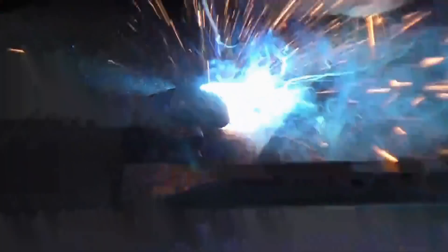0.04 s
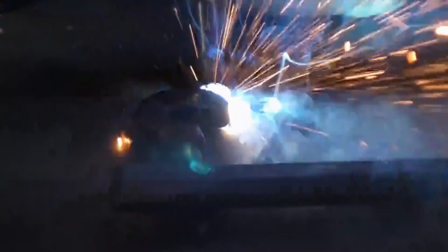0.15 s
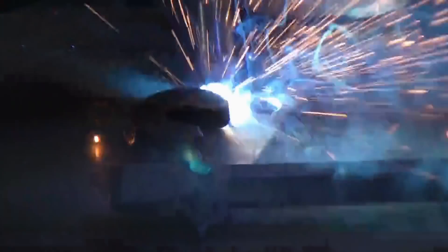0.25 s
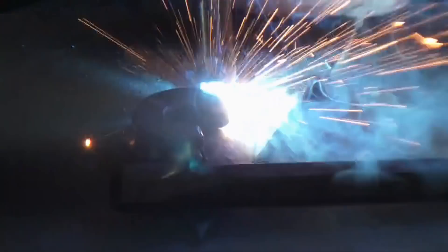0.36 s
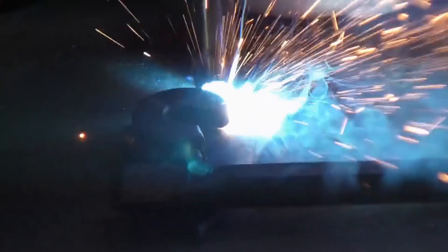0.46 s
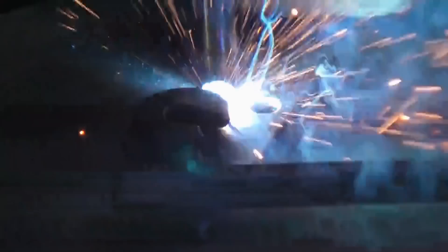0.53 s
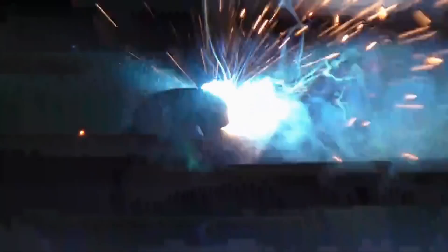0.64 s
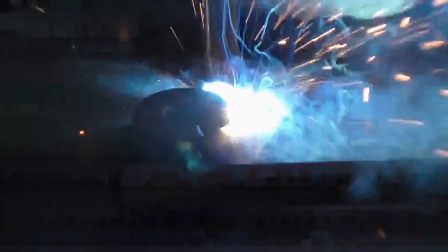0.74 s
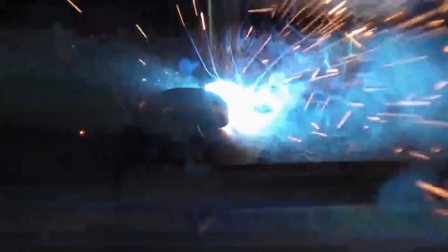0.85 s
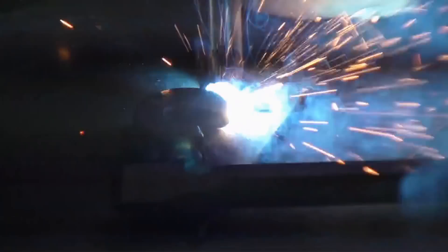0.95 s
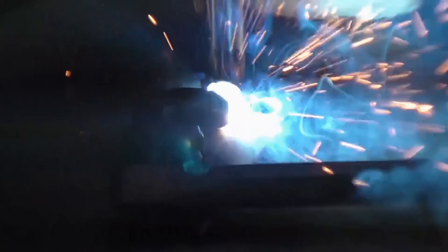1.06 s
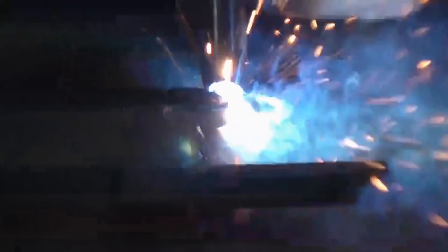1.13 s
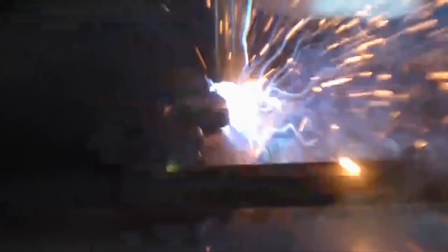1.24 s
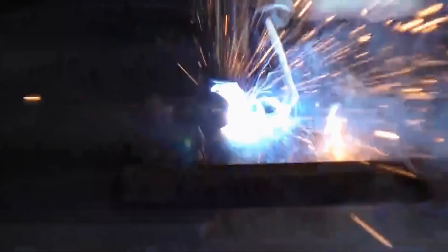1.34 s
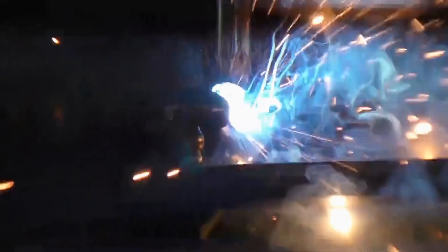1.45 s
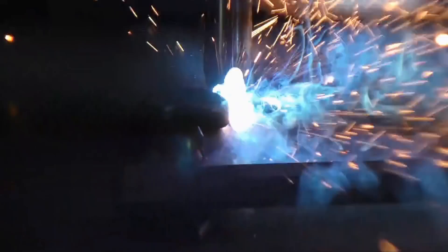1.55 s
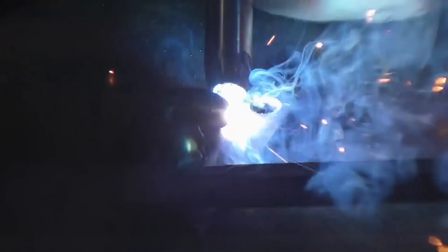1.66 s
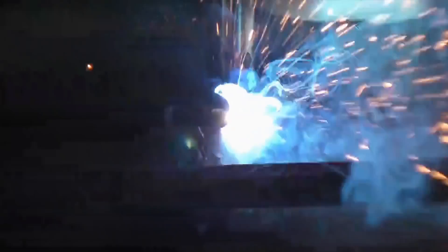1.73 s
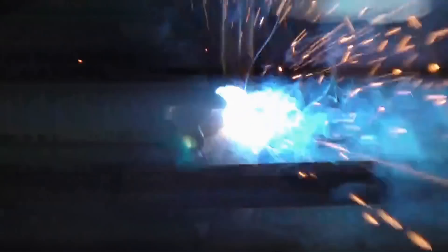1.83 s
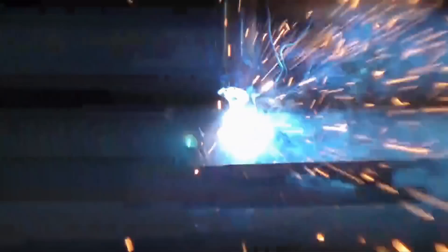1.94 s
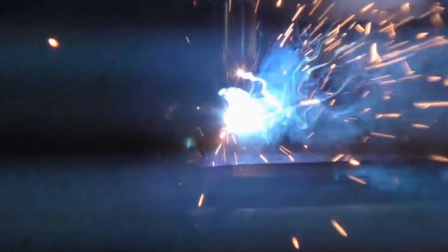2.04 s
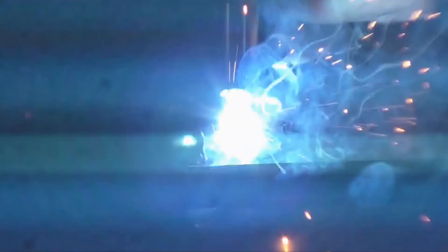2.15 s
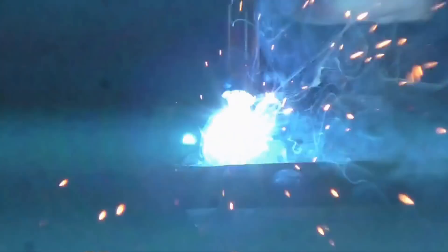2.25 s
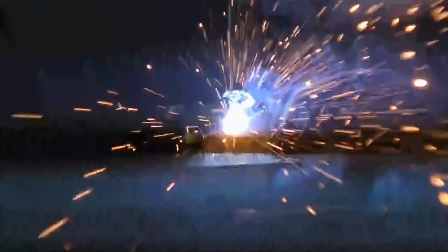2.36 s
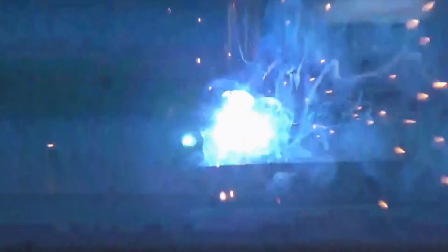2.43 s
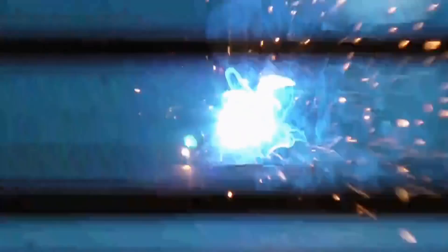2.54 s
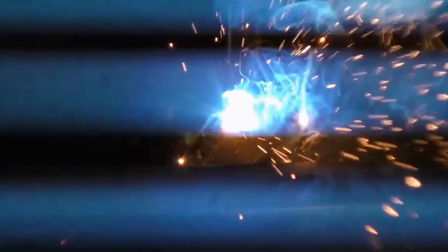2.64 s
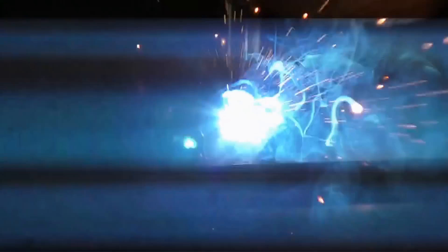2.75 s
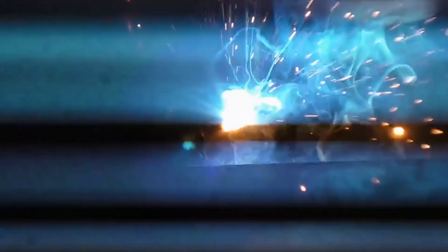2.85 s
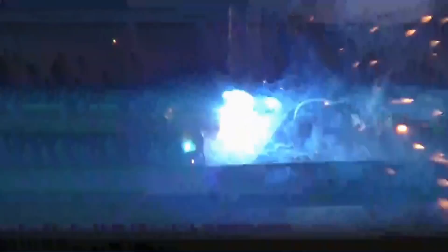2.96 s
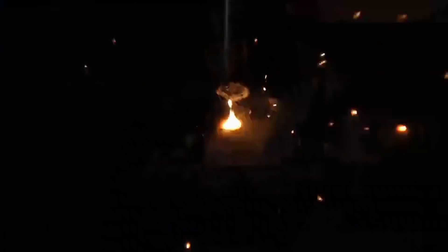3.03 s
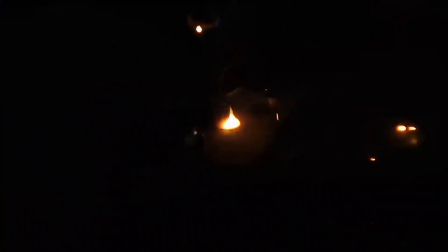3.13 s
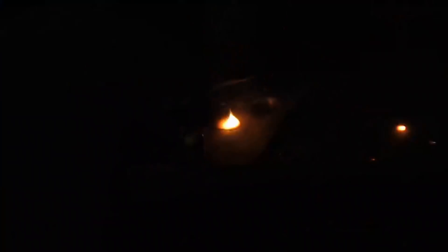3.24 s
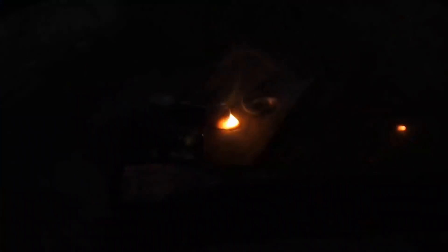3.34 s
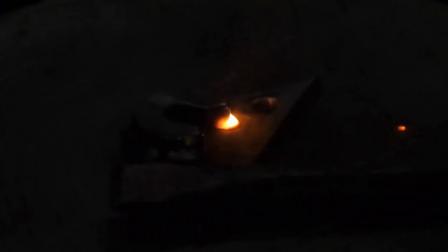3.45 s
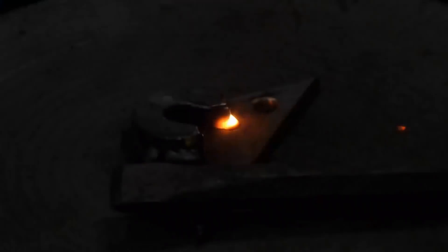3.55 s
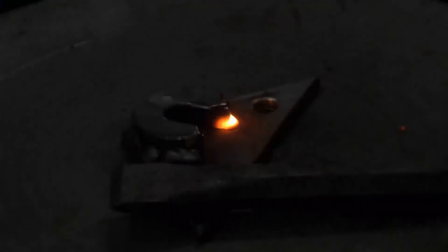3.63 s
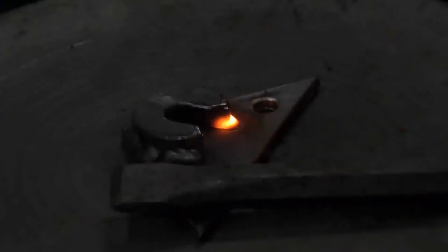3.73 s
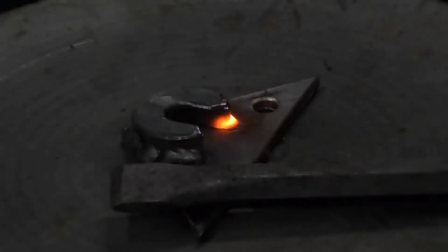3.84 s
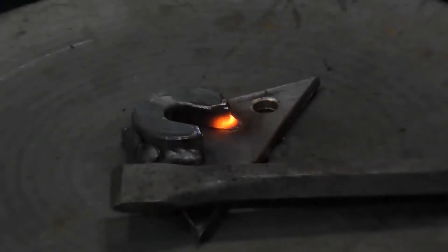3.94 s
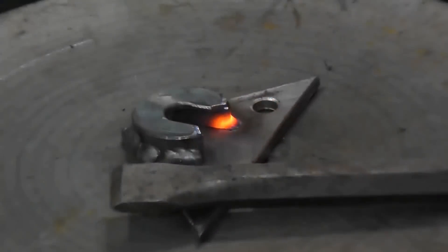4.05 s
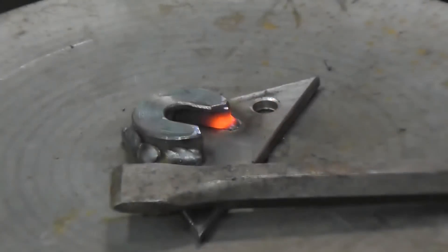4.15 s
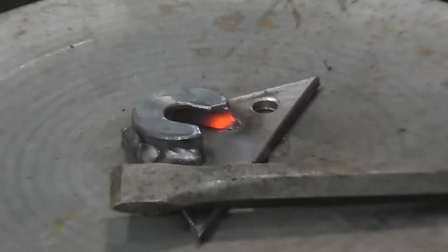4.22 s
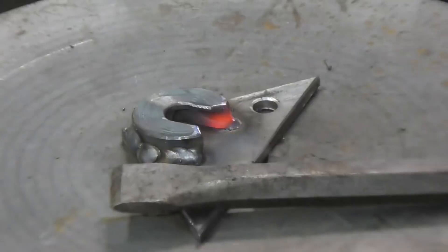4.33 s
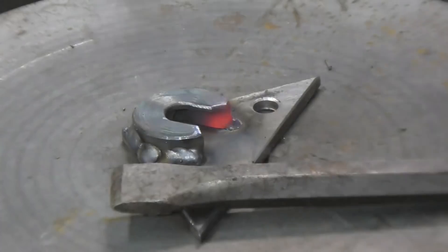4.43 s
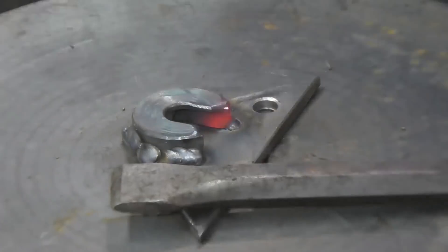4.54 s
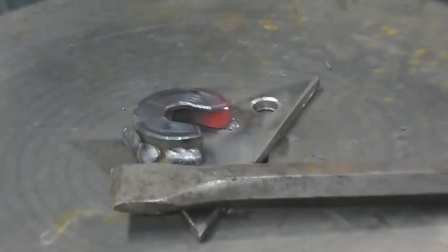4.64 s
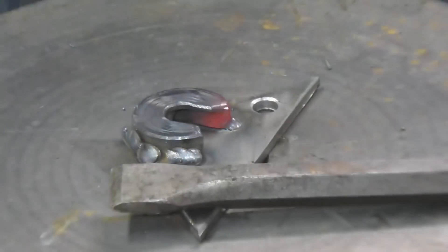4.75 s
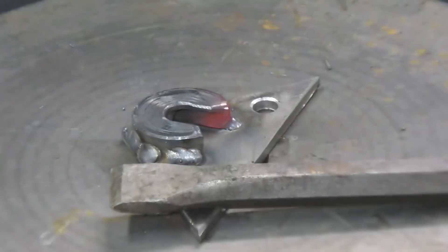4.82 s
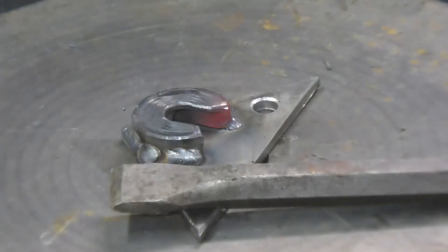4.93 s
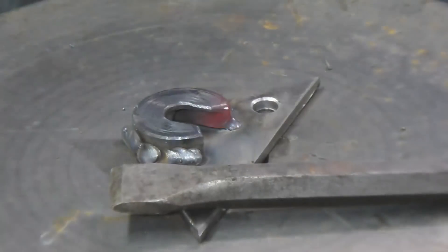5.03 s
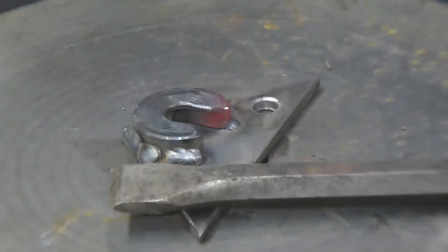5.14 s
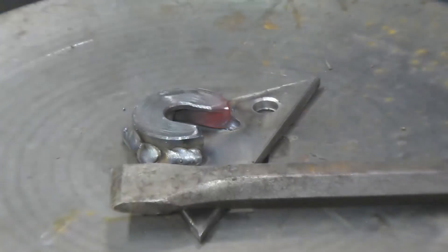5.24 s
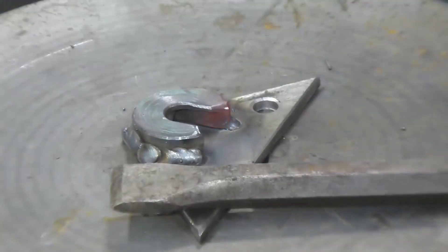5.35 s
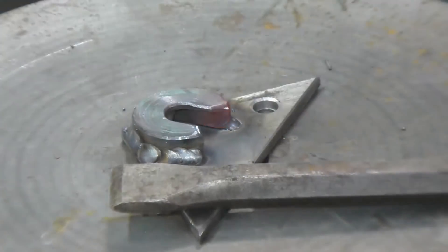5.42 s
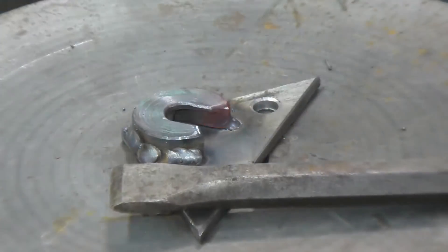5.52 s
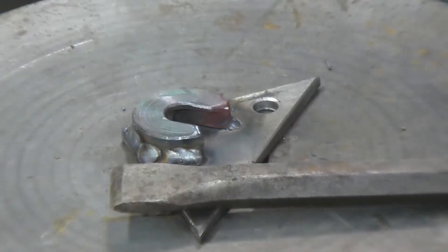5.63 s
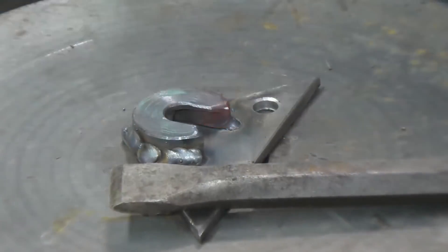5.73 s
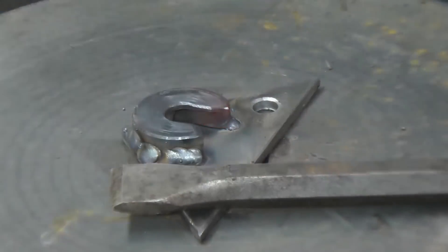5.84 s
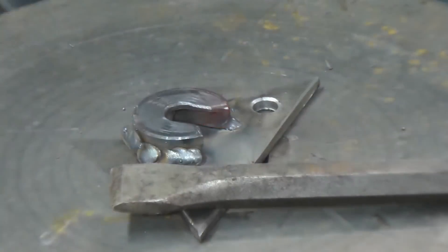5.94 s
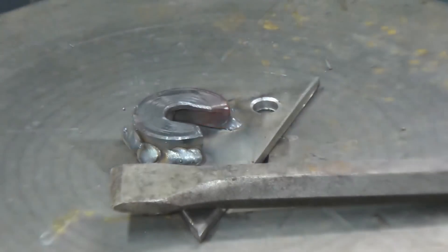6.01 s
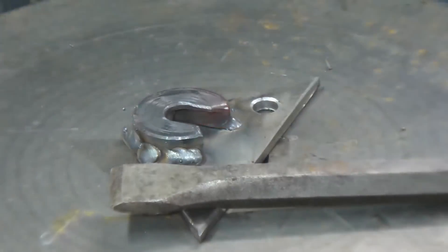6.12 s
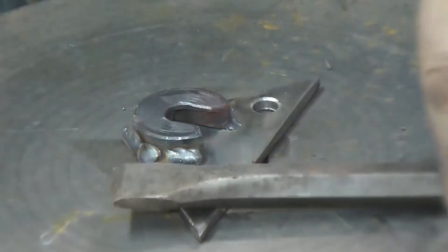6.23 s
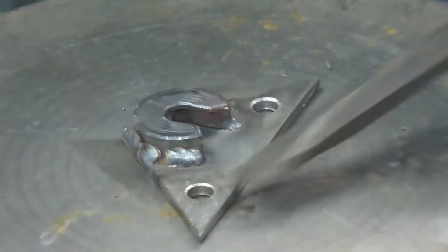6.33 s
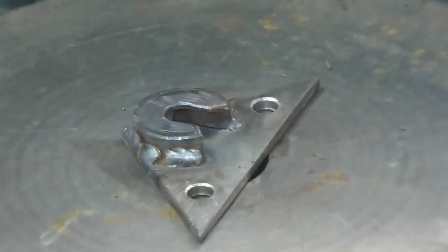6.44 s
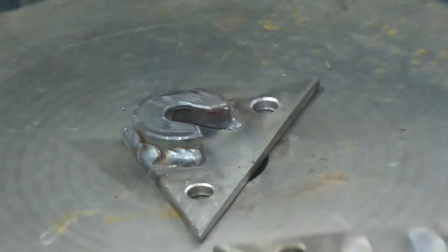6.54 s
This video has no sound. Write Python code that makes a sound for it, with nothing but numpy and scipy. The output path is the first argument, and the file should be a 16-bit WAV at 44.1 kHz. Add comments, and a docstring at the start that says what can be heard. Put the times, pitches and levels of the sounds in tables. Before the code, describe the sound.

In a workshop, a welder sputters and snaps right in front of the microphone for about three seconds, squashing everything else. After it ends, there is near silence, then distant motors fade up. Faint ticks, gritty scrapes of the torch, hollow thumps on the bench with a soft low throb and little clinks follow, ending with a brief ringing scrape of steel on steel.

```python
"""A wire-feed arc crackles close by for three seconds: random bursts excite a short crack and faint steel ring.
As it stops, the gain control lets go over a second and a machinery drone of filtered noise and hum rises.
Two ticks of the cooling weld sound meanwhile; then the torch scrapes, as runs of noise slips ringing modes.
The torch is put down with dull knocks, a soft low throb sets in, and small loose steel clinks.
Last, the chisel that weighted the part taps the plate and is dragged away, ringing in damped modes."""
import sys
import numpy as np
from scipy import signal
from scipy.fft import rfft, irfft, next_fast_len
from scipy.io import wavfile
from scipy.ndimage import uniform_filter1d

SR = 44100
rng = np.random.default_rng(int(sys.argv[2]) if len(sys.argv) > 2 else 0)


def store_wav(level_fs):
    """Save 16-bit WAV to argv[1]."""
    pcm = np.round(np.clip(np.atleast_2d(level_fs), -1, 1) * 32767)
    wavfile.write(sys.argv[1], SR, pcm.T.astype(np.int16))


N = 290178
T = np.arange(N) / SR


def undb(db):
    """Amplitude ratio: convert decibels to gain."""
    return 10 ** (np.asarray(db) / 20)


def curve(rows):
    """Linear interpolation: join (s, value) rows by straight lines."""
    return np.interp(T, *np.transpose(rows))


def at_hz(rows, hz):
    """Logarithmic pitch scale: read (Hz, value) rows on a log-frequency axis."""
    f, value = np.transpose(rows)
    return np.interp(np.log(np.maximum(hz, 1)), np.log(f), value)


def unit_rms(x):
    """Power normalisation: scale to rms 1."""
    return x / np.sqrt(np.mean(x ** 2))


def unit_energy(x):
    """Energy normalisation: scale the sum of squares to 1."""
    return x / np.sqrt(np.sum(x ** 2))


def response(spectrum, size=4096):
    """Minimum phase: fold the cepstrum of a (Hz, dB) colour into a causal impulse response of unit energy."""
    log_gain = np.log(undb(at_hz(spectrum, np.fft.rfftfreq(size, 1 / SR))))
    cepstrum = irfft(log_gain)
    cepstrum[1:size // 2] *= 2
    cepstrum[size // 2 + 1:] = 0
    return unit_energy(irfft(np.exp(rfft(cepstrum))))


def through(x, impulse):
    """Linear filtering: convolve a sound with an impulse response."""
    return signal.fftconvolve(x, impulse)[:len(x)]


def octaves(x):
    """Filter bank: split into overlapping octave bands that sum to the whole, as (Hz, band) pairs."""
    centres = 31.25 * 2 ** np.arange(10)
    size = next_fast_len(len(x))
    spectrum, hz = rfft(x, size), np.fft.rfftfreq(size, 1 / SR)
    bands = []
    for centre in centres:
        weight = at_hz(np.c_[centres, centres == centre], hz)
        bands.append((centre, irfft(spectrum * weight)[:len(x)]))
    return bands


def walk(rate):
    """Slow random modulation: normal values, rate per second, joined by lines; spread near 1."""
    return 1.2 * np.interp(T * rate, np.arange(1024), rng.standard_normal(1024))


def clicks(times, sizes):
    """Impulse train: one single-sample click of the given size at each time."""
    return np.bincount((np.asarray(times) * SR).astype(int), sizes, N)[:N]


def spread_out(mid, side):
    """Sum-and-difference stereo: left and right from their common part and their difference."""
    return np.array([mid + side, mid - side])


def even_out(tail):
    """Spectral smoothing: the early part of a diffuse tail keeps fine ripple but loses broader peaks."""
    spectrum = rfft(tail)
    power = np.abs(spectrum) ** 2
    fine, broad = (uniform_filter1d(uniform_filter1d(power, size=size), size=size) for size in (45, 300))
    evened = irfft(spectrum * np.sqrt(np.abs(broad / fine)), len(tail))
    early = np.interp(T[:len(tail)], [.04, .09], [1, 0])
    return early * evened + (1 - early) * tail


# Reverberation time of the shop. Columns: band_hz, t60_s
SHOP_T60 = [(200, 0.3), (1200, 0.37), (4000, 0.23), (11000, 0.29), (16000, 0.19)]


def shop(x, wet_db, side_db):
    """Diffuse reverberation: direct sound plus decaying noise tails; side_db sets how widely they surround."""
    t = T[:SR // 2]
    build_up = np.clip((t - .003) / 0.0002, 0, 1)

    def tail():
        bands = octaves(rng.standard_normal(len(t)))
        decaying = sum(band * undb(-60 * t / at_hz(SHOP_T60, hz)) for hz, band in bands)
        return unit_energy(even_out(decaying * build_up))

    mid, side = through(x, tail()), through(x, tail())
    return spread_out(x + undb(wet_db) * mid, undb(side_db) * side)


# Colour of the faint hiss. Columns: frequency_hz, level_db
HISS = [(1000, -5), (9900, -1), (10700, 10), (16000, 3.5)]
# Course of the hiss around its base level. Columns: time_s, level_db
HISS_LEVEL = [(3.7, -8.5), (4.4, 3)]


def faint_hiss(level_db=-70.5):
    """Shaped noise: white noise through a fixed colour, rising slowly in level."""
    return undb(level_db + curve(HISS_LEVEL)) * through(rng.standard_normal(N), response(HISS))


# Colour of the machinery noise. Columns: frequency_hz, level_db
DRONE = [(30, -8), (70, 1.5), (110, 2), (160, 0.5), (220, 4.5), (330, -3.5), (480, -4), (760, -11.5),
         (1100, -5.5), (2100, -10.5), (4000, -21.5), (7000, -34.5), (16000, -34)]
# Motor hum lines. Columns: pitch_hz, level_db (before wavering)
HUM = [(151, -12), (210, -8), (324, -7.5), (500, -15.5)]
# Courses of the low rumble, the rasp above it and the hum. Columns: time_s, level_db
RUMBLE = [(3.5, -3.5), (4.0, -1), (4.15, 0.5), (4.9, 5), (5.18, 0), (5.6, 1), (6.58, 3)]
DRONE_RASP_LEVEL = [(3.4, -0.5), (3.65, 2.5), (3.95, 3.5), (4.1, -1.5), (4.4, 1), (5.15, 0.5), (5.55, 2.5),
                    (6.5, 1.5)]
HUM_LEVEL = [(3.4, 0), (4.2, 5.5), (4.8, 0), (6.5, -1.5)]


def machinery(level_db=-53.5, rumble_top_hz=400, rumble_flutter_db=3, rasp_flutter_db=1.5):
    """Broadband noise plus tones: fluttering rumble and steadier rasp from distant machines, over wavering hum."""
    rumble, rasp, hum = 0, 0, 0
    for hz, band in octaves(through(rng.standard_normal(N), response(DRONE))):
        if hz < rumble_top_hz:
            rumble = rumble + band * undb(rumble_flutter_db * walk(24))
        else:
            rasp = rasp + band * undb(rasp_flutter_db * walk(30))
    for hz, db in HUM:
        cycles = np.cumsum(hz * (1 + .016 * walk(18))) / SR
        hum = hum + undb(db + 2.5 * walk(12)) * np.sin(2 * np.pi * cycles)
    rasp = rasp * undb(curve(DRONE_RASP_LEVEL))
    rumble = rumble * undb(curve(RUMBLE))
    return undb(level_db) * (rasp + rumble + hum * undb(curve(HUM_LEVEL)))


# A turning machine throbs once a revolution. Fields: start_s, revolutions_per_s, pitch_hz
THROB = (5.24, 5.27, 64)


def throb(level_db=-52):
    """Amplitude modulation: a wavering low tone swells softly with every revolution."""
    start, rate, hz = THROB
    swell = np.sin(np.pi * rate * np.maximum(T - start, 0)) ** 8
    cycles = np.cumsum(hz * (1 + 0.054 * walk(60))) / SR
    return undb(level_db + walk(3.28)) * swell * np.sin(2 * np.pi * cycles)


def contacts(rows, modes, rasp):
    """Modal excitation by friction: each touch is a run of uneven slips that rasps and rings damped modes."""
    t, out = T[:SR // 4], np.zeros(N + SR)
    surface = response(rasp)
    coarse_t = t[::SR // 500]
    for s, length, db, tilt, ring_db in rows:
        # how the object is pressed shifts its modes a little from touch to touch
        shifts = 1 + .004 * rng.standard_normal(len(modes))
        grit = undb(3 * np.interp(t, coarse_t, rng.standard_normal(len(coarse_t))))
        age = 2 * t / length
        slips = rng.standard_normal(len(t)) * grit * age * np.exp(-age ** 2 / 2)
        push = through(slips, response([(125, 0), (16000, 7 * tilt)]))  # seven octaves
        ring = 0
        for (hz, mode_db, t60), shift in zip(modes, shifts):
            damped = undb(-60 * t / t60) * np.sin(2 * np.pi * hz * shift * t)
            mode = unit_energy(through(slips, damped))
            ring = ring + undb(mode_db + tilt * np.log2(hz)) * np.sqrt(t60) * mode
        sound = unit_energy(through(push, surface)) + undb(ring_db) * unit_energy(ring)
        out[int(s * SR):][:len(t)] += undb(db) * sound
    return out[:N]


# Touches: the cooling weld ticks, the torch touches and slides on steel, a small steel part clinks,
# the chisel taps the plate as it is gripped, the chisel is dragged off the part.
# Columns: start_s, length_s, rasp_energy_db, treble_tilt_db_per_octave, ring_over_rasp_db
TICKS = [(3.798, 0.0054, -22, 3, -13), (3.939, 0.0029, -33, 2, 11)]
TORCH = [(4.223, 0.018, -20.5, 1.5, -36), (4.305, 0.0091, -27.5, -1, -29), (4.416, 0.053, -21, 3, -31),
         (4.479, 0.025, -18, -0.5, -24), (4.508, 0.039, -13.5, 2, -29), (4.685, 0.022, -16, 3.5, -18),
         (4.753, 0.024, -13.5, 2, -1.5), (4.83, 0.025, -20, -3, -29), (4.94, 0.026, -19.5, -2, -30),
         (5.008, 0.036, -10, -2, -35), (5.267, 0.0077, -14, -1.5, -7.5), (5.31, 0.088, -16, 0, -17),
         (5.405, 0.033, -17.5, -1.5, -14), (5.915, 0.031, -21.5, -2, -12), (5.98, 0.056, -21.5, -1.5, -20),
         (6.185, 0.031, -24.5, 1.5, -10)]
CLINKS = [(5.281, 0.0044, -28, -2, 0), (5.341, 0.005, -33, 2, 10), (5.35, 0.0057, -28.5, 3.5, 11),
          (5.363, 0.0035, -31, -8, 4)]
PLATE = [(6.259, 0.0091, -17.5, 9, 6)]
CHISEL = [(6.321, 0.021, -17, -3.5, -6), (6.342, 0.0065, -23.5, -1, 2), (6.363, 0.021, -27, 5, 4),
          (6.378, 0.016, -18, 0.5, 0.5), (6.402, 0.0094, -27, 1, 13.5), (6.425, 0.014, -24, 7, -12)]
# Resonances of each object. Columns: pitch_hz, level_db (before tilt and decay weighting), t60_s
TICK_MODES = [(2250, 0, 0.02)]
TORCH_MODES = [(929, 4, 0.088), (1520, 3, 0.06), (2250, -3, 0.093), (4370, 2, 0.049), (4730, -18, 0.057),
               (10750, -7, 0.04), (11930, -3, 0.041), (13000, -4, 0.046)]
CLINK_MODES = [(3450, -2, 0.035), (4440, 7, 0.079), (9636, 0, 0.05), (10400, -1, 0.05), (11000, 4, 0.02)]
PLATE_MODES = [(3000, 5, .03), (4005, 9, .05), (4100, 5, .03), (4850, 1, .07), (5222, 6, .08),
               (6100, -4, .025), (9426, -5, .08), (10690, -4, .07), (11140, 5, .04)]
CHISEL_MODES = [(1570, 3, .035), (2067, 10, .055), (2837, 8, .05), (3540, 6, .04), (4264, -2, .065),
                (5324, 6, .06), (8300, -10, .05), (9220, -3, .05), (9528, 3, .06), (10420, -1, .05),
                (10780, -2, .035)]
# Colour of torch and clink rasp, and of bare steel sliding on steel. Columns: frequency_hz, level_db
RASP = [(60, -30), (200, 11.5), (600, -3.5), (1400, 7.5), (3200, 0.5), (6500, -6.5), (9500, -10),
        (11000, -6), (16000, -19)]
STEEL_RASP = [(100, 2), (700, -6), (1350, 13), (2300, 7.5), (3400, 5.5), (4600, -5), (6500, -0.5),
              (8500, -22), (10800, -18), (16000, -17)]


def handling():
    """Modal superposition: cooling weld, torch, loose steel, plate and chisel each ring their own modes."""
    return (contacts(TICKS, TICK_MODES, STEEL_RASP)
            + contacts(TORCH, TORCH_MODES, RASP)
            + contacts(CLINKS, CLINK_MODES, RASP)
            + contacts(PLATE, PLATE_MODES, STEEL_RASP)
            + contacts(CHISEL, CHISEL_MODES, STEEL_RASP))


# Dull blows on the bench.
# Columns: start_s, length_s, rasp_energy_db, treble_tilt_db_per_octave, ring_over_rasp_db (before high-pass)
KNOCKS = [(5.0185, 0.0048, -6, -2.5, 7), (5.023, 0.0018, -9.5, -3, 7.5), (5.039, 0.0041, -9.5, -6.5, 4),
          (5.059, 0.0027, -27, -11, 8), (5.268, 0.0024, -24, -3.5, -1), (5.276, 0.0063, -13, -4.5, -0.5),
          (5.326, 0.0087, -17.5, -1.5, 5), (5.373, 0.012, -13.5, -4.5, 2.5), (5.585, 0.022, -18.5, -4, 0),
          (6.442, 0.014, -30.5, -1.5, 15)]
# Bench resonances. Columns: pitch_hz, level_db (before tilt and decay weighting), t60_s
BENCH_MODES = [(163.3, -3, 0.33), (212.6, 15.5, 0.11), (258, 10.5, 0.12), (371, 11.5, 0.09),
               (510, -3, 0.12), (972, 3, 0.11)]
# Colour of a blow on the bench top. Columns: frequency_hz, level_db
BENCH_RASP = [(40, -56), (110, -10), (200, -1.5), (400, 11.5), (850, 1.5), (1450, 3), (2000, 1),
              (3500, -15), (8000, -10), (16000, -14)]


def bench(lag_db=-3):
    """Plate radiation: little sound below the lowest mode; a quarter-cycle lag parts the two ports in phase."""
    high_pass = signal.butter(2, 120, "high", fs=SR, output="sos")
    blows = signal.sosfilt(high_pass, contacts(KNOCKS, BENCH_MODES, BENCH_RASP))
    lagged = signal.hilbert(blows, next_fast_len(N))[:N].imag
    return shop(blows, wet_db=-17.5, side_db=-6.5) + spread_out(0, undb(lag_db) * lagged)


# Big drops that explode above the crackle. Columns: start_s, energy_db, extra_body_db
POPS = [(0.0331, -13, -0.5), (0.0905, -11, -2), (0.1994, -9, -0.5), (0.2081, -9.5, -11), (0.29, -9, -5),
        (0.3193, -10.5, -1.0), (0.4877, -14, -1), (0.4956, -8, 3), (0.552, -8, -5), (0.626, -14, 2),
        (0.6477, -15.5, -3), (0.7458, -20, -2), (0.7573, -18, 5.5), (0.9438, -14, 4), (0.9536, -9, -2.5),
        (0.9635, -5.5, 2.5), (0.9753, -16, -2), (1.0145, -7.5, -6), (1.0236, -13.5, 4.5), (1.0569, -14, 5),
        (1.074, -15, 3), (1.141, -14, 1), (1.1502, -11, -3), (1.1677, -15, 2), (1.2065, -5.0, -1),
        (1.242, -15, -3.5), (1.2884, -14, 2.5), (1.3027, -6.5, -6.5), (1.3659, -9.5, -2.5),
        (1.4245, -14, -10), (1.4352, -14, -1.5), (1.5222, -9, -1.5), (1.653, -1.5, 0.5), (1.7199, -3, -3),
        (1.8058, -15.5, 4), (1.9009, -12.5, 0), (1.915, -14, 6), (1.9733, -10, -5), (1.9936, -12.5, -4.5),
        (2.0057, -14, 5), (2.0964, -13.5, 2.5), (2.3125, -12, 6), (2.362, -20, 2.5), (2.425, -19.5, 5.5),
        (2.503, -12, 4), (2.6458, -13, 4), (2.7055, -9.0, 4.5), (2.7869, -18.5, 8), (2.8661, -11.5, 2),
        (3.0511, -5.5, -1), (3.0834, -11.5, -1.5), (3.1114, -10, 3.5)]
# The wire burns back and the crackle stalls. Columns: start_s, end_s, spatter_gain_db
STALLS = [(1.271, 1.294, -4), (1.376, 1.424, -8), (1.494, 1.523, -13), (1.74, 1.807, -6),
          (1.852, 1.899, -2.5), (2.224, 2.303, -7), (2.367, 2.46, -9.5), (2.515, 2.564, -6.5),
          (2.813, 2.864, -6)]
ARC_END_S = 3.125
DROPS_PER_S, DROP_JITTER = 115, .24  # nominal rate; spread of the log of the wait
SCATTER_DB = -0.4  # random scatter of drop strength
GROW_S = 0.0054  # no other drop leaves the wire this long before or after a big one explodes


def drops(restrike_db=-4, count=160):
    """Relaxation cycle: after each stall the wire strikes, then sheds drops; longer waits make louder bursts."""
    out = np.zeros(N)
    stall_starts, stall_ends, _ = np.transpose(STALLS)
    for start, end in zip(np.r_[0, stall_ends], np.r_[stall_starts, ARC_END_S]):
        timing, scatter = rng.standard_normal((count, 2)).T.clip(-2, 2)
        waits = np.exp(DROP_JITTER * timing)
        times = start + np.r_[0, np.cumsum(waits)] / DROPS_PER_S
        sizes = np.r_[undb(restrike_db), waits * undb(SCATTER_DB * scatter)]
        out += clicks(times, sizes * (times < end))
    for s, _, _ in POPS:
        out[np.abs(T - s) < GROW_S] = 0
    return out / np.sqrt(np.mean(out[T < ARC_END_S] ** 2))


def spatter(rate_per_s=380, spatter_db=-6, fizz_db=-9, count=2000):
    """Poisson process: clicks at random moments over a fine fizz; both sink while the arc stalls."""
    gaps, sizes = rng.random((count, 2)).T
    times = np.cumsum(-np.log(1 - gaps)) / rate_per_s
    ticks = unit_rms(clicks(times, sizes))
    fizz = unit_rms(rng.standard_normal(N) * undb(5.4 * rng.standard_normal(N)))
    out = undb(spatter_db) * ticks + undb(fizz_db + 2 * walk(120)) * fizz
    for start, end, db in STALLS:
        out[(T > start) & (T < end)] *= undb(db)
    return out * (T < ARC_END_S)


# Colour of one burst. Columns: frequency_hz, level_db
BURST = [(60, -27.5), (130, -28), (210, -19), (400, -21), (560, -18.5), (800, -20.5), (980, -10.5),
         (1170, -7.5), (1500, -10), (1800, -12), (2130, -15.5), (2230, -4.5), (2580, -7), (2850, -3),
         (3080, -6.5), (3750, -4), (4000, -7), (4600, -7), (4950, -1.5), (5300, -7), (6300, -3.5),
         (7000, -6), (7750, -2), (9250, -2.5), (9800, 2.5), (10500, 2.5), (11900, 0.5), (12700, -1),
         (14200, -1.5), (15200, -2.5), (16200, -17)]
# Faint resonances of the steel under the arc. Columns: pitch_hz, level_db (relative to each other)
STEEL_MODES = [(2242, 1), (4901, 0), (6573, 2), (7702, 0.5), (10304, 11), (11016, 21.5), (11242, 11.5)]


def workpiece(t60_s=.07, ring_db=-16):
    """Impulse response: the crack of a burst plus the faint damped modes of the steel."""
    t = T[:SR // 5]
    ring = sum(undb(db - 60 * t / t60_s) * np.cos(2 * np.pi * hz * t) for hz, db in STEEL_MODES)
    return response(BURST, size=len(t)) + undb(ring_db) * unit_energy(ring)


# Reflections from bench and tools. Columns: delay_s, level_db
ECHOES = [(.00027, -15), (.00143, -9), (.0054, -13), (.00576, -13), (.0062, -13)]


def reflections(x):
    """Specular reflection: small hard surfaces close by throw back the treble of every snap."""
    t = T[:SR // 20]
    paths = sum(undb(db) * (t >= delay) * (t < delay + 1 / SR) for delay, db in ECHOES)
    low_pass = signal.butter(1, 3000, fs=SR, output="sos")
    return through(x - signal.sosfiltfilt(low_pass, x), paths)


# Crackle strength as the torch moves along the seam. Columns: time_s, level_db (before DROP_DB and spatter)
ARC = [(0, -41.5), (.43, -41), (.53, -39), (.72, -41.5), (.9, -39.5), (1, -39.5), (1.2, -40.5), (1.35, -44),
       (1.62, -42), (1.85, -42.5), (1.95, -40), (2.17, -39), (2.35, -35.5), (2.58, -42.5), (2.72, -38.5),
       (2.97, -40.5), (3.1, -44.5)]
DROP_DB = -5.5  # drops within the crackle
SPIT_S = .0003  # how long vapour spits after a burst


def welder(spit_db=-5, body_scatter_db=1.46, thud_db=-5):
    """Impulsive excitation: the wire shorts and bursts about a hundred times a second amid fizzing spatter."""
    pop_s, pop_db, body_db = np.transpose(POPS)
    crackle = undb(curve(ARC)) * (undb(DROP_DB) * drops() + spatter())
    sparks = crackle + clicks(pop_s, undb(pop_db))
    # vapour spits out for a moment after every burst
    keep = np.exp(-1 / (SPIT_S * SR))
    vapour = np.sqrt(signal.lfilter([1 - keep], [1, -keep], sparks ** 2 + 1e-18))
    sparks = sparks + undb(spit_db) * vapour * rng.standard_normal(N)
    # bursts vary in their mix of dull and bright sound; each big drop has its own body and a low thud
    body = sparks * (undb(body_scatter_db * walk(150)) - 1)
    body = body + clicks(pop_s, undb(pop_db) * (undb(body_db) - 1))
    body = signal.sosfilt(signal.butter(1, 5000, fs=SR, output="sos"), body)
    thud = clicks(pop_s, undb(pop_db + body_db) ** 2)
    thud = signal.sosfilt(signal.butter(1, 700, fs=SR, output="sos"), thud)
    snaps = through(sparks + body + undb(thud_db) * thud, workpiece())
    return shop(snaps, wet_db=-3.5, side_db=-9.5) + reflections(snaps)


GAIN_RANGE_DB = 23  # most that the gain control can duck


def scene():
    """Superposition: the arc is close, straight ahead and far louder than the handling and machines around it."""
    # handling off to the sides reaches the two ports by unrelated paths
    steel = shop(handling(), wet_db=-11.0, side_db=-7.5) + spread_out(0, undb(0.5) * handling())
    drone = spread_out(machinery() + throb(), machinery() + throb())
    return faint_hiss() + drone + steel + bench() + undb(GAIN_RANGE_DB) * welder()


# Gain of the difference between the two microphone ports. Columns: frequency_hz, gain_db
WIDTH = [(60, -2), (220, -4), (700, -3), (3000, -2), (7500, -1.5), (11000, -16)]
GAIN_THRESHOLD_DB = -36.5  # treble level above which the gain ducks
TOP_HZ = 16200  # upper band limit


def record(dry, release_s=1.204, bend=0.77):
    """Dynamic compression: gain ducks on loud treble and lets go over a second; the ports narrow the top."""
    mid, side = (dry[0] + dry[1]) / 2, (dry[0] - dry[1]) / 2
    width = undb(at_hz(WIDTH, np.fft.rfftfreq(2 * N, 1 / SR)))
    side = irfft(rfft(side, 2 * N) * width)[:N]
    treble = signal.sosfilt(signal.butter(2, 5000, "high", fs=SR, output="sos"), mid)
    loudness = np.sqrt(np.abs(uniform_filter1d(treble ** 2, size=SR // 40)))
    excess = np.clip(loudness / undb(GAIN_THRESHOLD_DB), 1, undb(GAIN_RANGE_DB))
    excess[0] = undb(GAIN_RANGE_DB)  # the arc is already burning
    # the held level drains steadily, so the gain returns slowly at first and then faster
    drain = T * (undb(GAIN_RANGE_DB) ** bend - 1) / release_s
    held = (np.maximum.accumulate(excess ** bend + drain) - drain) ** (1 / bend)
    low_pass = signal.ellip(8, .2, 70, TOP_HZ, fs=SR, output="sos")
    return signal.sosfilt(low_pass, spread_out(mid, side) / held)


dry = scene()
out = record(dry)
store_wav(out)
```